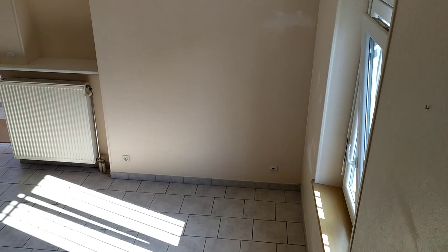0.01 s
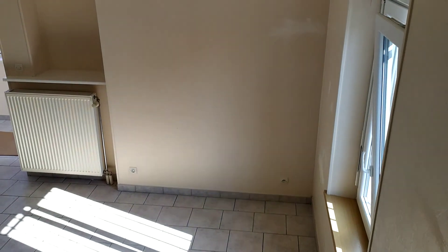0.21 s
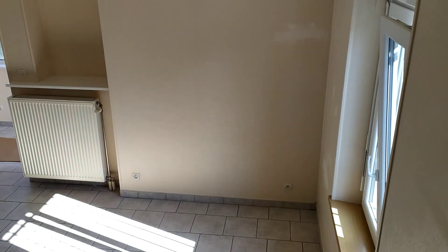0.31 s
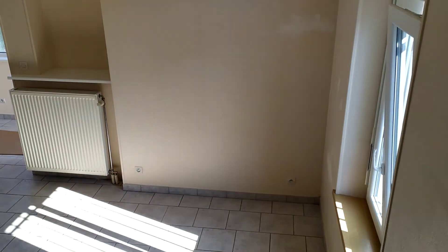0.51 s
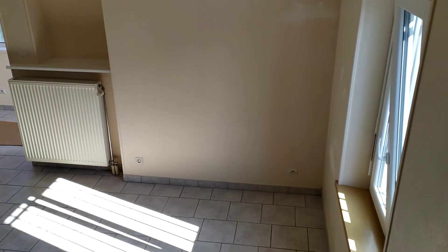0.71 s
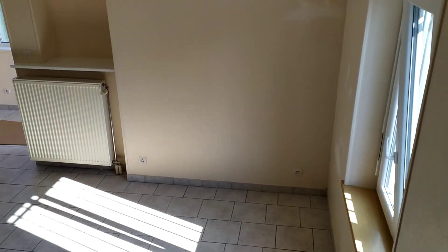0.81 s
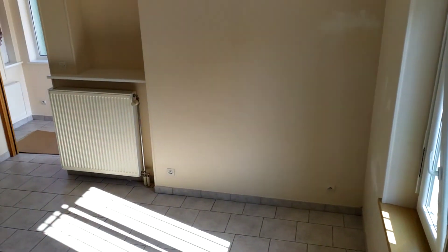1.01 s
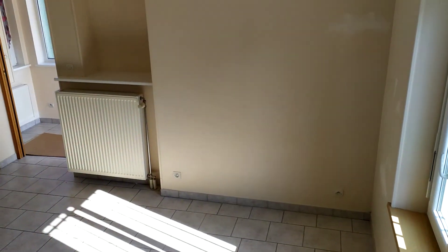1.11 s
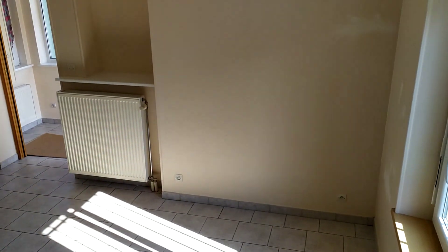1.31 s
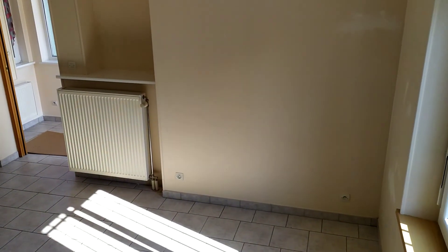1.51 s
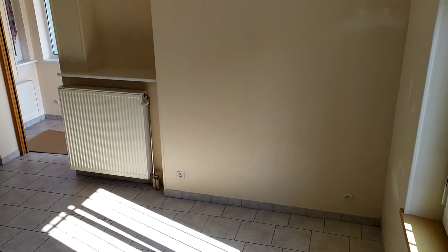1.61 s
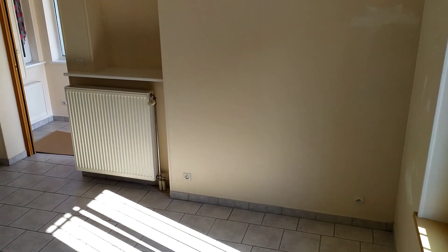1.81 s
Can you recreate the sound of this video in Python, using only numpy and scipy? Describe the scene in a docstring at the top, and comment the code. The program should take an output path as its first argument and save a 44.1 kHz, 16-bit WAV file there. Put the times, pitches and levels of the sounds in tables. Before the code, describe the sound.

Two unhurried steps with gritty heels and clapping soles ring across a tiled room, another beginning

```python
"""A soft sole landing over a faint hiss, then slow footsteps on tiles in an empty, echoing house, close above.
Heels crunch grit, knock the tile and thud; soles clap, thud, puff air and boom the floor; scuffs crackle.
Impacts are decaying sines, grit is coloured clicks, the hiss is banded noise.
Bare walls ring on: the thuds, claps and one short grit click per contact feed a decaying noise echo.
A last heel lands at the end."""
import sys
import numpy as np
from scipy import signal
from scipy.fft import rfft, irfft, next_fast_len
from scipy.io import wavfile

SR = 44100
rng = np.random.default_rng(int(sys.argv[2]) if len(sys.argv) > 2 else 0)


def digitize_waveform(pressure):
    """Quantize a signal to 16-bit integers and store it at the path in sys.argv[1].

    Rows of a 2-D input are taken as channels; values are limited to [-1, 1].
    """
    field = np.atleast_2d(pressure).T
    bounded = np.clip(field, -1, 1)
    quanta = np.round(bounded * 32767).astype(np.int16)
    wavfile.write(sys.argv[1], SR, quanta)


N = 83790
T = np.arange(N) / SR


def from_db(db):
    """Gain of a level."""
    return 10 ** (np.asarray(db) / 20)


def rms_one(x):
    """Scale to rms 1."""
    return x / np.sqrt(np.mean(x ** 2) + 1e-20)


def at_hz(points, hz, column=1):
    """Interpolate a table column on a log-frequency axis."""
    points = np.array(points)
    return np.interp(np.log(np.maximum(hz, 1)), np.log(points[:, 0]), points[:, column])


def dying(start_s, t60_s):
    """Envelope that starts at full level and falls 60 dB in t60_s."""
    return (T >= start_s) * from_db(-60 * np.maximum(T - start_s, 0) / t60_s)


def strike(start_s, hz, t60_s, contact_s, sag_per_s=0):
    """A mode that swells over the contact time and rings out; sag lowers its pitch steadily."""
    t = np.clip(T - start_s, 0, 2 * t60_s)
    swell = 1 - np.exp(-t / contact_s)
    return dying(start_s, t60_s) * swell * np.sin(2 * np.pi * hz * t * (1 - sag_per_s * t / 2))


def colour(x, points):
    """Shape a sound by a (Hz, dB) spectrum."""
    size = next_fast_len(N)
    hz = np.arange(size // 2 + 1) * SR / size
    return irfft(rfft(x, size) * from_db(at_hz(points, hz)), size)[..., :N]


def drift(rate_hz):
    """Slow random curve: normal draws, two per period of rate_hz, joined by lines."""
    steps = rng.standard_normal(int(2 * rate_hz * N / SR) + 3)
    return np.interp(T * 2 * rate_hz, np.arange(len(steps)), steps)


# left-right likeness of diffuse sound: (freq_hz, correlation)
LIKENESS = [(60, 0.99), (180, 0.93), (550, 0.63), (1650, -0.056), (4970, -0.18), (15000, 0.3)]
EDGES_HZ = 28 * 2 ** np.arange(0, 9.6, .4)


def stereo_bands(gain):
    """Bands of stereo noise times gain(hz); mid and side mix sets how alike the ports are."""
    out, white = 0, rng.standard_normal((2, 2, N))
    for k, (low, high) in enumerate(zip(EDGES_HZ, EDGES_HZ[1:])):
        band = signal.butter(2, [low, high], "band", fs=SR, output="sos")
        mid, side = signal.sosfilt(band, white[k % 2])
        hz = np.sqrt(low * high)
        alike = np.clip(at_hz(LIKENESS, hz), -1, 1)
        stereo = np.sqrt(1 + alike) * mid + np.sqrt(1 - alike) * side * [[1], [-1]]
        out = out + gain(hz) * stereo
    return out


# hiss and rumble spectrum, relative: (freq_hz, density_db_per_hz)
HISS = [(18, -37), (30, -6), (86, -4), (138, -21.5), (204, -13.5), (415, -18.5), (449, -19), (913, -17.5),
        (988, -20.5), (1350, -19), (2830, -26), (9710, -25.5), (16000, -28)]
# treble level of the hiss: (time_s, level_db)
TREBLE = [(0, 3.5), (.2, 8), (.5, 0), (.75, 4.5), (1.0, -1.5), (1.3, 0), (1.45, -4), (1.65, -3),
          (1.78, 0.5), (1.9, 0)]
HISS_DB, TREBLE_HALF_HZ = -52, 4000
RUMBLE_PATCHY_DB, HISS_PATCHY_DB = 2.5, 1.5


def hiss():
    """Lumpy rumble from outside and a hiss whose treble swells and sinks, as banded noise."""
    treble_db = np.interp(T, *np.transpose(TREBLE))
    rumble_drift = drift(7.3)

    def gain(hz):
        patchy_db = RUMBLE_PATCHY_DB * rumble_drift if hz < 120 else HISS_PATCHY_DB * drift(5.5)
        treble_share = hz ** 2 / (hz ** 2 + TREBLE_HALF_HZ ** 2)
        return from_db(at_hz(HISS, hz) + patchy_db + treble_db * treble_share)

    return from_db(HISS_DB) * rms_one(stereo_bands(gain))


# echo of the room, levels relative: (freq_hz, level_db, t60_s)
ROOM = [(60, 2, 0.37), (109, -3, 0.7), (202, 0.5, 0.46), (333, 0, 0.76), (496, -1, 0.69), (700, 3.5, 0.8),
        (1050, 2.5, 1), (1430, 0, 0.89), (1670, -3, 1), (2170, 2, 1), (3240, -5, 0.95), (4950, -3, 0.76),
        (10400, -3.5, 0.69), (15000, -14.5, 0.85)]
ROOM_DB, EARLY_DB, EARLY_T60_S, FIRST_ECHO_S = 2.5, -3, .1, .0055


def room(x):
    """Convolve with noise: early echoes and a tail that dies band by band."""
    def gain(hz):
        tail = dying(FIRST_ECHO_S, at_hz(ROOM, hz, column=2))
        early = from_db(EARLY_DB) * dying(FIRST_ECHO_S, EARLY_T60_S)
        return from_db(at_hz(ROOM, hz)) * (tail + early)

    echo = stereo_bands(gain)
    echo = echo / np.sqrt(np.sum(echo ** 2) / 2)
    return from_db(ROOM_DB) * signal.fftconvolve(echo, x[None], axes=1)[:, :N]


# spectrum of crushed grit: (freq_hz, level_db)
GRIT = [(300, -6), (1000, -7.5), (2500, -3.5), (3600, -1), (5500, -10), (7500, -2), (10500, -1.5),
        (15000, -15)]
GRAINS_PER_S = 7000


def grains():
    """Dense uneven clicks of crushed grit, drawn separately for each port."""
    clicks = (rng.random((2, N)) < GRAINS_PER_S / SR) * rng.standard_normal((2, N))
    return rms_one(colour(clicks, GRIT))


GRIT_SEND_DB = 18.5


def echo_clicks():
    """One short grit-coloured click per contact, which feeds the echo."""
    clicks = np.zeros((1, N))
    starts_s = [row[0] for table in (HEELS, SOLES, SCUFFS) for row in table]
    clicks[0, [int((start_s + .0004) * SR) for start_s in starts_s]] = 1
    click = colour(clicks, GRIT)
    return from_db(GRIT_SEND_DB) * click / np.sqrt(np.sum(click ** 2) / np.sum(clicks))


def tinted(grit, treble_db):
    """Grit with its treble above 5 kHz raised or lowered."""
    treble = signal.sosfilt(signal.butter(2, 5000, "high", fs=SR, output="sos"), grit)
    return grit + (from_db(treble_db) - 1) * treble


# grit crackling as a foot rolls or lifts: (start_s, level_db, t60_s, treble_db, swell_s)
SCUFFS = [(0.588, -30.5, 0.011, 1, 0.0002), (1.741, -47, 0.3, 1, 0.0089)]


def scuffs(grit, ring):
    """Small crackles: grit that swells and dies; ring scales both times."""
    out = 0
    for start_s, level_db, t60_s, treble_db, swell_s in SCUFFS:
        swell = 1 - np.exp(-np.maximum(T - start_s, 0) / (ring * swell_s))
        out = out + from_db(level_db) * tinted(grit, treble_db) * dying(start_s, ring * t60_s) * swell
    return out


# tile modes: (freq_hz, level_db, t60_s)
CLAP = [(486, -4, .04), (635, -8, 0.037), (712, -11, 0.051), (826, -1.5, 0.015), (1030, -20, 0.02),
        (1316, 4, 0.023), (2033, -8.5, 0.06), (2181, -4, 0.035), (2600, -4.5, 0.036), (3380, -11, 0.029),
        (3930, -13, 0.012), (4840, -41, 0.012)]


def tile(start_s, clap_db, tilt_db_per_octave, lags_s, ring):
    """The tile's modes in alternating polarity, each delayed by its lag; tilt pivots at 1 kHz."""
    out = 0
    for k, ((hz, level_db, t60_s), lag_s) in enumerate(zip(CLAP, lags_s)):
        mode_db = clap_db + level_db + tilt_db_per_octave * np.log2(hz / 1000)
        out = out - (-1) ** k * from_db(mode_db) * strike(start_s + lag_s, hz, ring * t60_s, .0001)
    return out


# sole landings: (start_s, thud_db, thud_pitch_hz, clap_db, clap_tilt_db_per_octave, boom_db, puff_db,
#                 puff_treble_db)
SOLES = [(.002, -29.5, 198, -39.5, -10.5, -38, -50, -2), (0.2583, -14, 199, -13.5, -2.5, -21, -28.5, -6),
         (1.0647, -20.5, 267.3, -14, -3, -25, -35, -14)]
# thud modes of sole on tile: (pitch_multiple, level_db, t60_s)
THUD = [(1.002, 3, 0.2), (1.239, -1, 0.14)]
# floor and room modes: (freq_hz, level_db, t60_s, swell_s)
BOOM = [(51.6, -18, 1, 0.021), (95.8, -4, 0.15, 0.0043), (119.1, 6.5, .25, 0.015)]
SOLE_CONTACT_S, PUFF_T60_S = .0013, .084


def soles(grit, late_s, ring):
    """The flat sole claps unevenly on the tile, thuds, puffs air and sets the floor booming."""
    out = 0
    for landing, lags_s in zip(SOLES, late_s):
        start_s, thud_db, pitch_hz, clap_db, tilt_db, boom_db, puff_db, treble_db = landing
        for multiple, level_db, t60_s in THUD:
            thud = strike(start_s, pitch_hz * multiple, ring * t60_s, SOLE_CONTACT_S)
            out = out + from_db(thud_db + level_db) * thud
        out = out + tile(start_s, clap_db, tilt_db, lags_s, ring)
        for hz, level_db, t60_s, swell_s in BOOM:
            boom = strike(start_s, hz, max(ring, .5) * t60_s, swell_s)
            out = out + from_db(boom_db + level_db) * boom
        out = out + from_db(puff_db) * tinted(grit, treble_db) * dying(start_s, ring * PUFF_T60_S)
    return out


# heel landings: (start_s, thud_db, thud_pitch_hz, grit_db, grit_treble_db)
HEELS = [(0.2158, -14.5, 217, -25.5, -6.5), (1.030, -22, 191, -23.5, -16), (1.8965, -25, 216, -30, -27)]
HEEL_T60_S, HEEL_CONTACT_S, HEEL_SAG_PER_S = .11, .0015, 5.0
CRUNCH_S, CRUNCH_T60_S = .0025, .006
DRAG_DB, DRAG_T60_S = -13, .066
KNOCK_DB = -11.5  # tile knock relative to the grit


def heels(grit, late_s, ring):
    """A crunch, a short drag, a knock of the tile and a low thud that sags in pitch."""
    out = 0
    for (start_s, thud_db, pitch_hz, grit_db, treble_db), lags_s in zip(HEELS, late_s):
        crunch_end_s = start_s + ring * CRUNCH_S
        held = (T >= start_s) * (T < crunch_end_s)
        crunch = np.maximum(held, dying(crunch_end_s, ring * CRUNCH_T60_S))
        drag = from_db(DRAG_DB) * dying(start_s, ring * DRAG_T60_S)
        thud = strike(start_s, pitch_hz, ring * HEEL_T60_S, HEEL_CONTACT_S, HEEL_SAG_PER_S)
        out = out + from_db(thud_db) * thud
        out = out + tile(start_s, grit_db + KNOCK_DB, -2.7, lags_s, ring)
        out = out + from_db(grit_db) * tinted(grit, treble_db) * (crunch + drag)
    return out


CLAP_SPREAD_S = .004242
MIC_LAG_S = .0003  # greatest lag between the ports for one tile mode
WALL_BLUR = .22  # rings towards the walls are this much shorter, so broader


def feet(grit, late_s, ring):
    """All contacts of the feet; ring scales their decay times."""
    heel_late_s = late_s[len(SOLES):]
    return heels(grit, heel_late_s, ring) + soles(grit, late_s, ring) + scuffs(grit, ring)


def scene():
    """Tile modes reach each port with small random lags, thuds and booms reach both together; room, hiss."""
    chance = rng.random((len(SOLES) + len(HEELS), len(CLAP), 3, 1))
    late_s = CLAP_SPREAD_S * chance[:, :, :1] ** 2 + MIC_LAG_S * chance[:, :, 1:]
    direct = feet(grains(), late_s, 1)
    to_walls = feet(echo_clicks(), 0 * late_s[:, :, :1], WALL_BLUR)
    return direct + room(to_walls[0]) + hiss()


# colour difference of the ports: (freq_hz, left_minus_right_db)
MIC_BALANCE = [(60, 1.5), (180, 0.5), (550, 1.5), (1650, -3.5), (4970, -1), (15000, 0.5)]
MIC_LOW_HZ, CUTOFF_HZ = 39.6, 16400


def record(dry):
    """The ports differ in colour; bass and top are cut."""
    half = np.array(MIC_BALANCE) * [1, .5]
    both = np.array([colour(dry[0], half), colour(dry[1], half * [1, -1])])
    both = signal.sosfilt(signal.butter(3, MIC_LOW_HZ, "high", fs=SR, output="sos"), both)
    return signal.sosfilt(signal.cheby2(12, 60, CUTOFF_HZ, fs=SR, output="sos"), both)


dry = scene()
out = record(dry)
digitize_waveform(out)
```